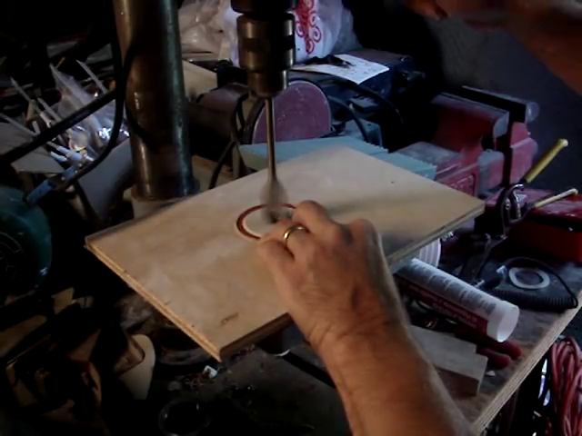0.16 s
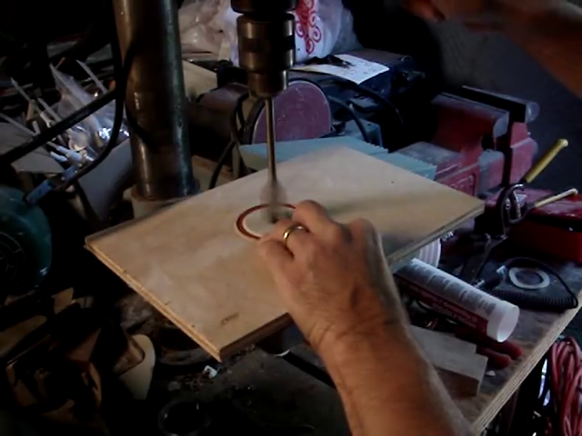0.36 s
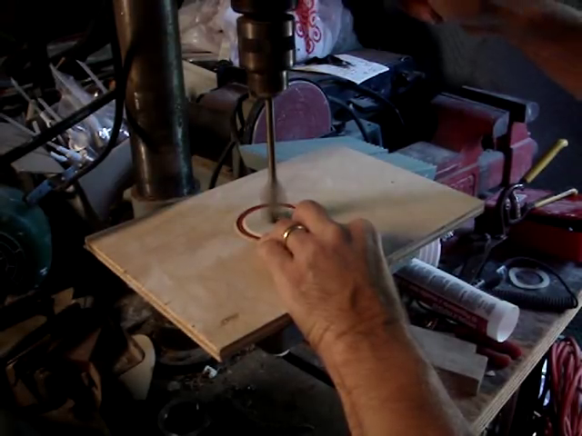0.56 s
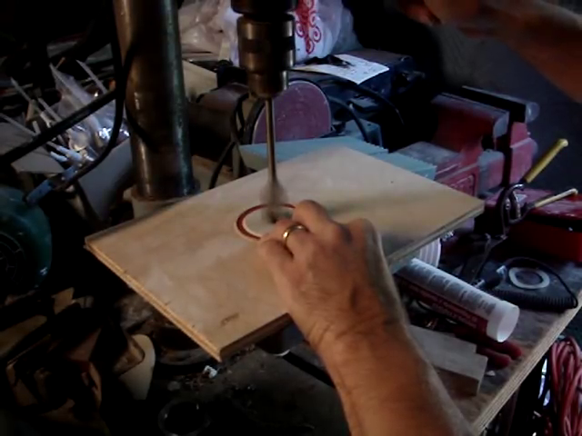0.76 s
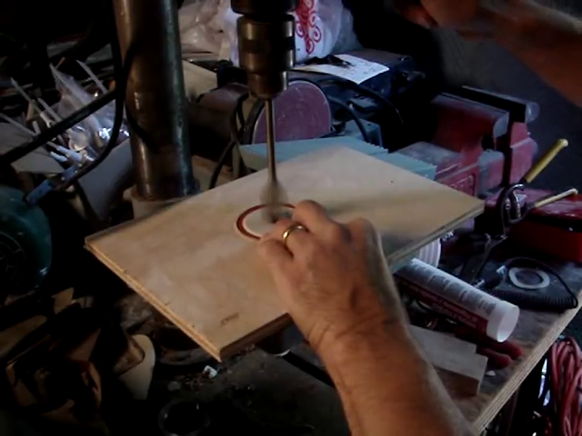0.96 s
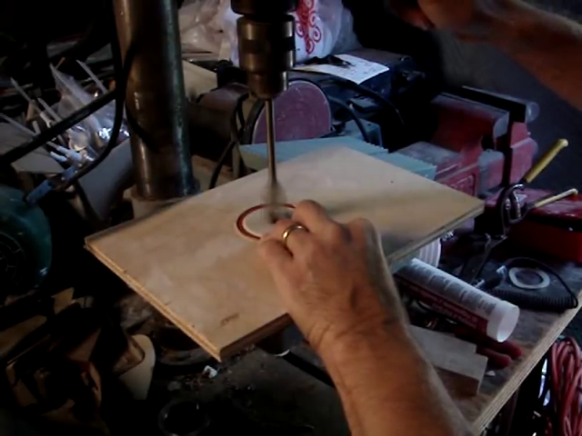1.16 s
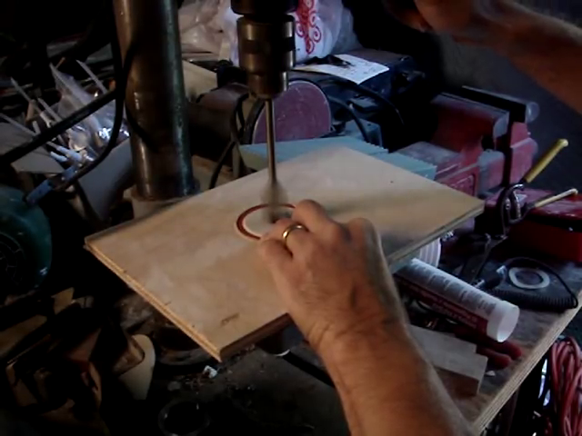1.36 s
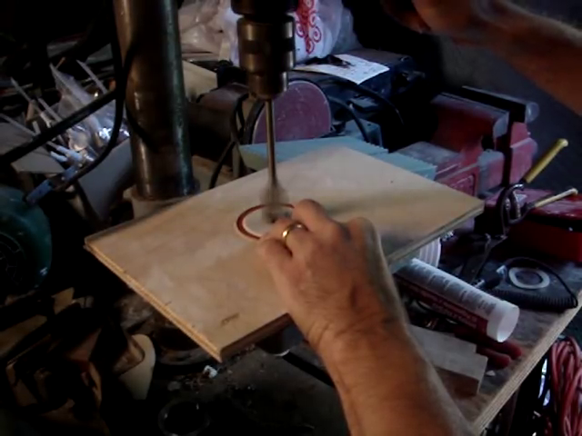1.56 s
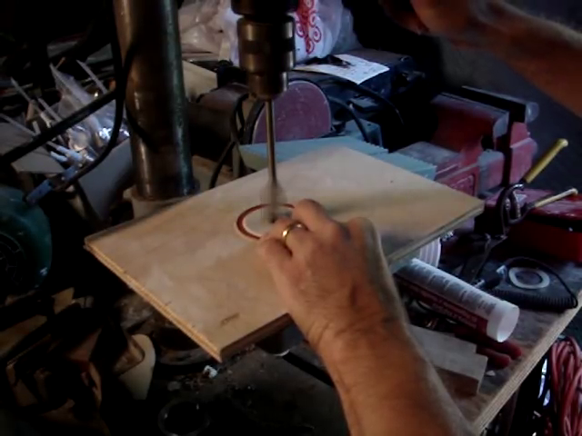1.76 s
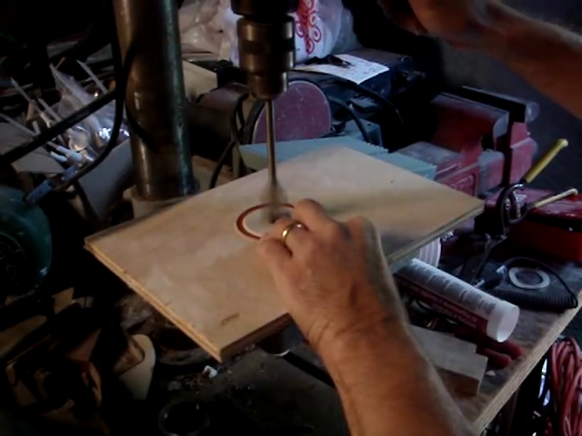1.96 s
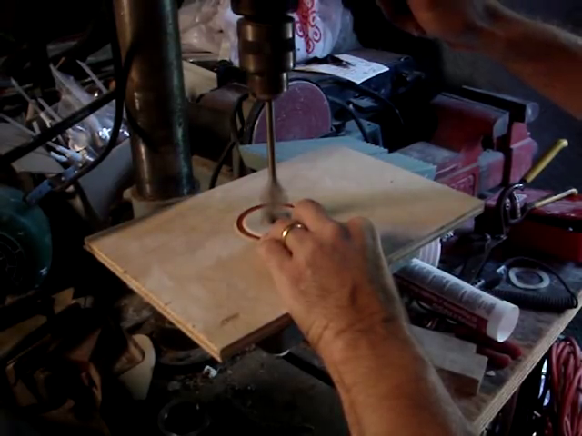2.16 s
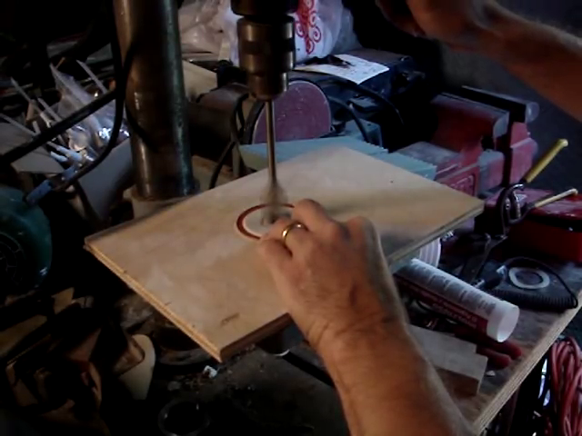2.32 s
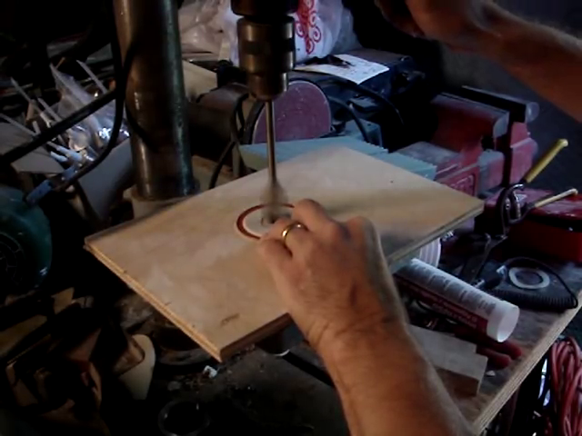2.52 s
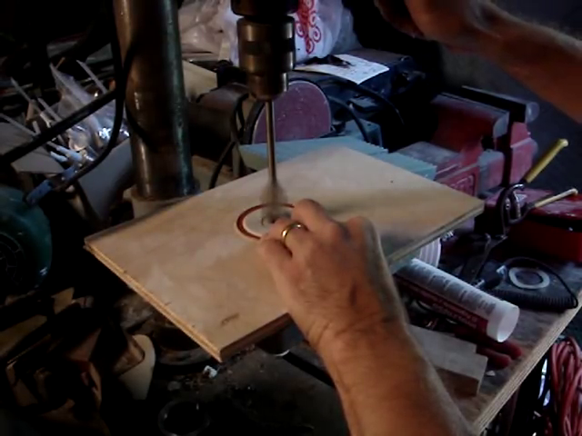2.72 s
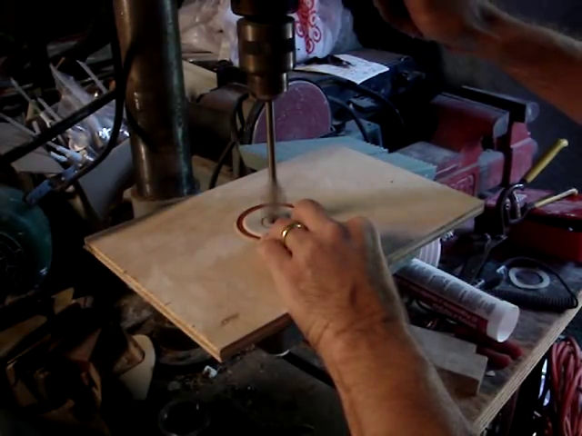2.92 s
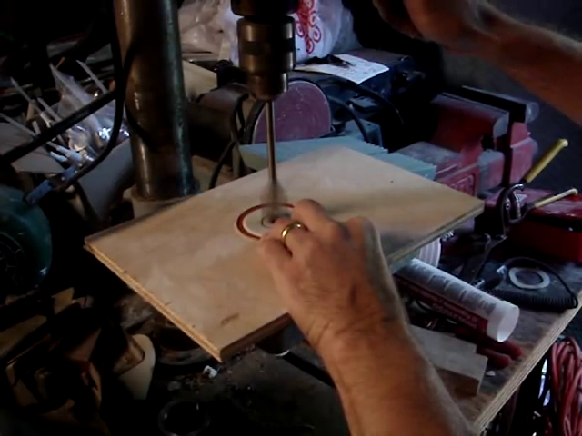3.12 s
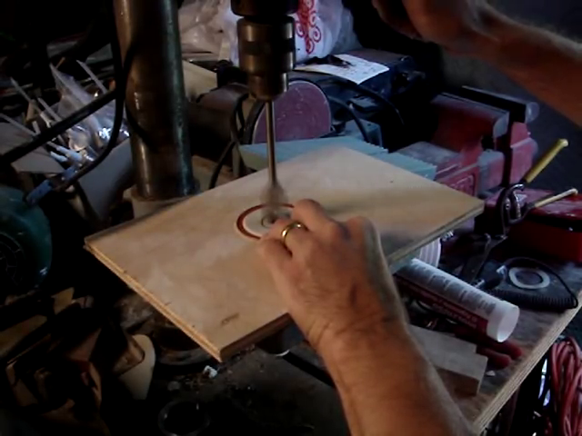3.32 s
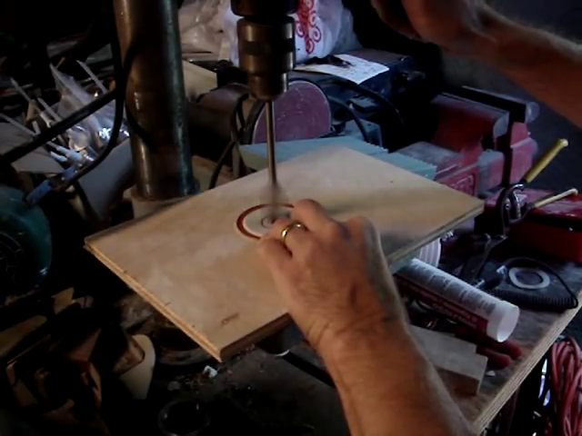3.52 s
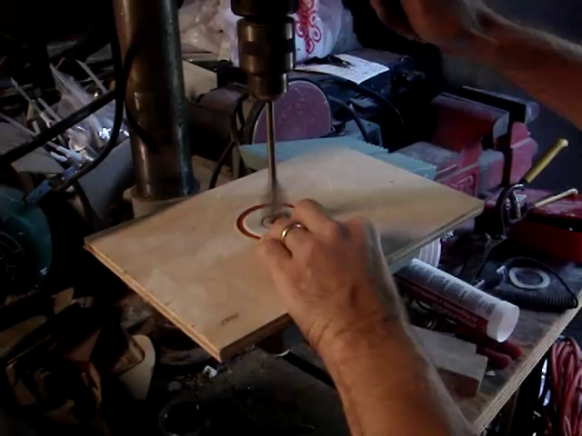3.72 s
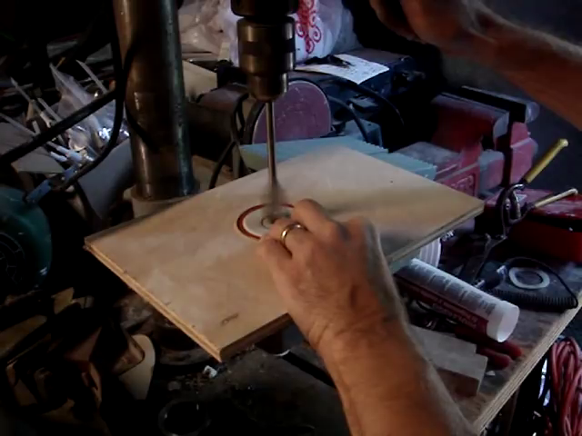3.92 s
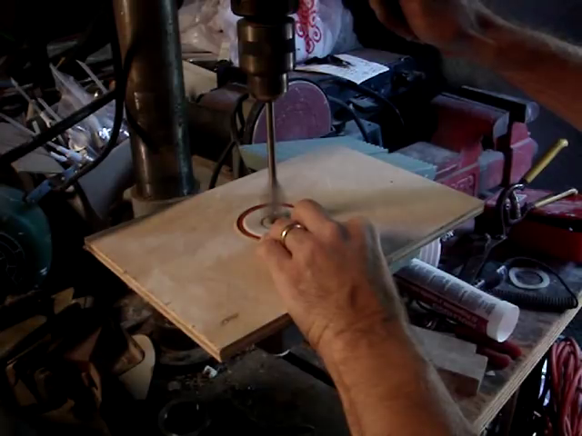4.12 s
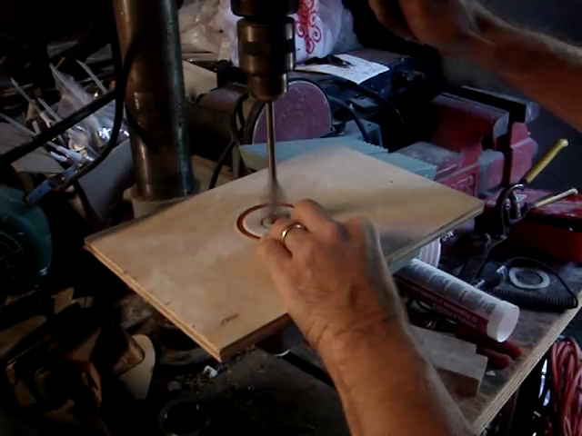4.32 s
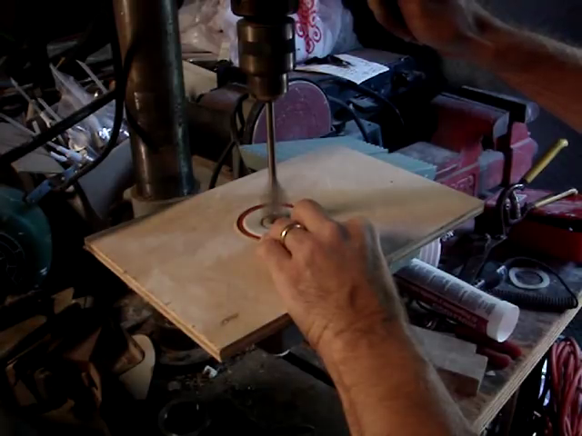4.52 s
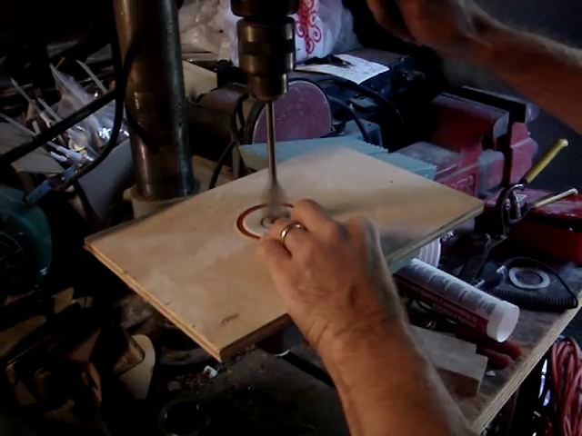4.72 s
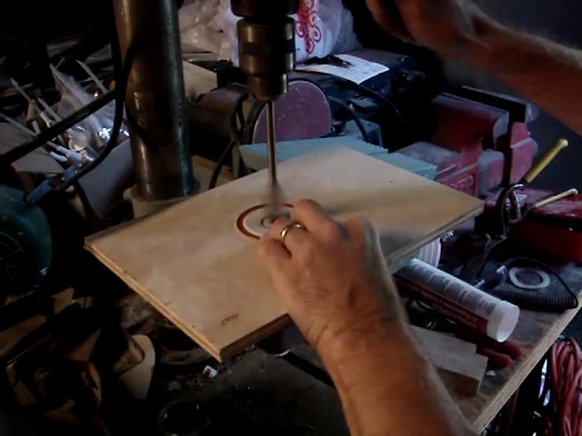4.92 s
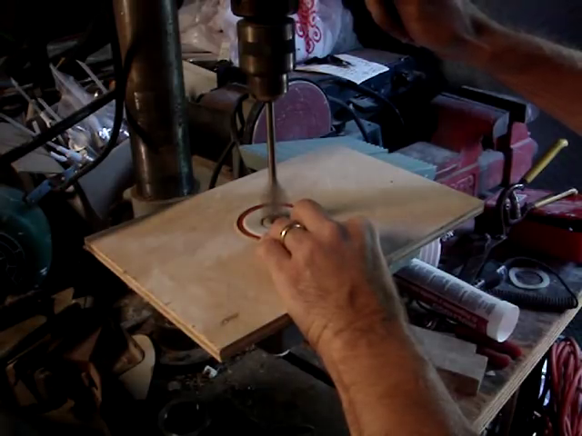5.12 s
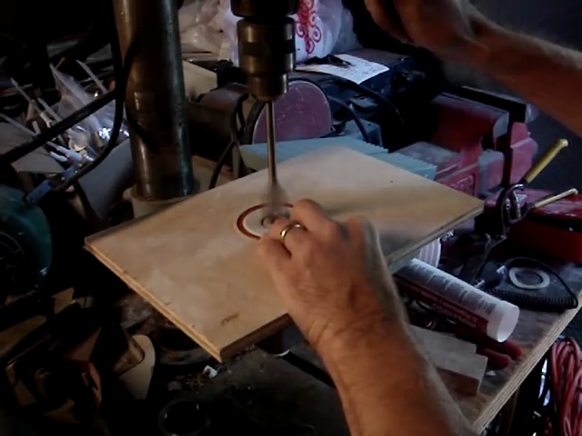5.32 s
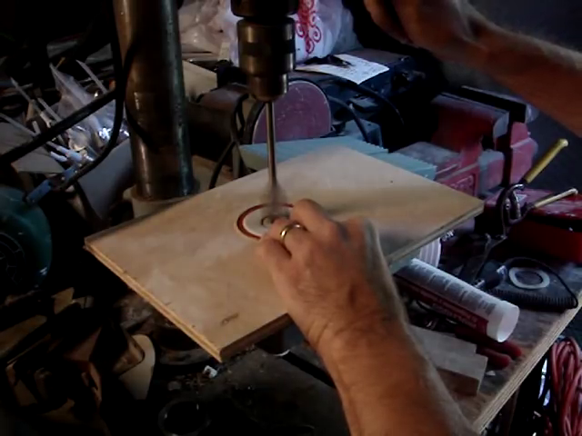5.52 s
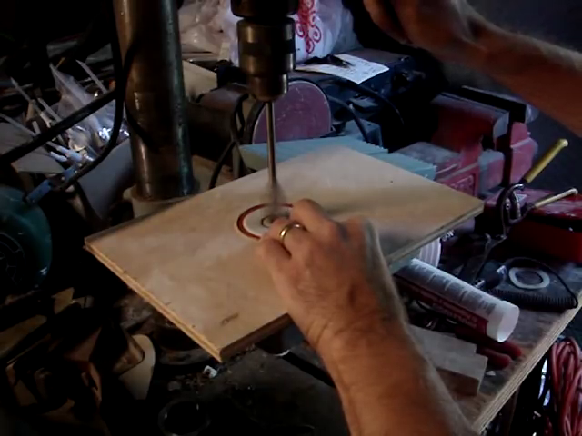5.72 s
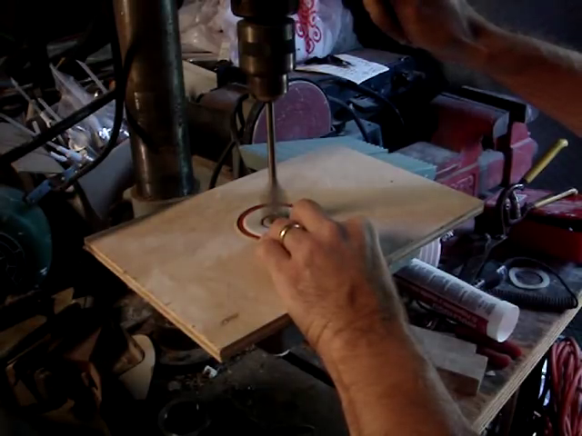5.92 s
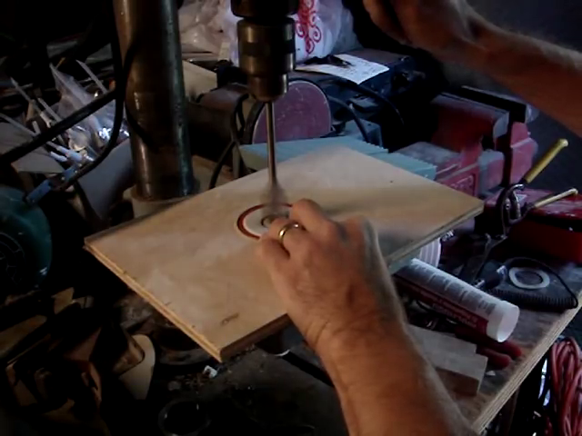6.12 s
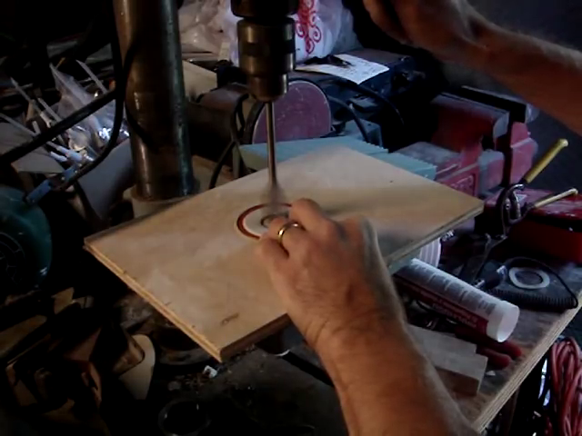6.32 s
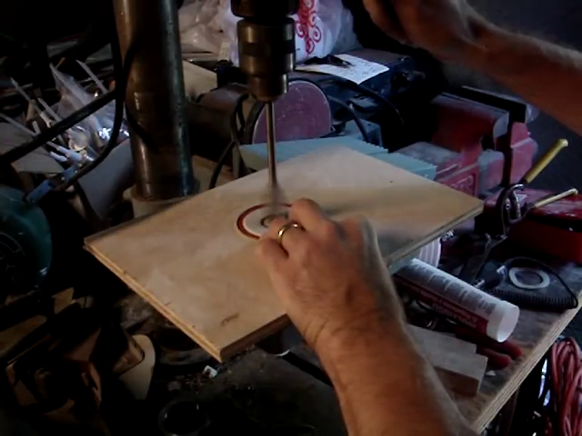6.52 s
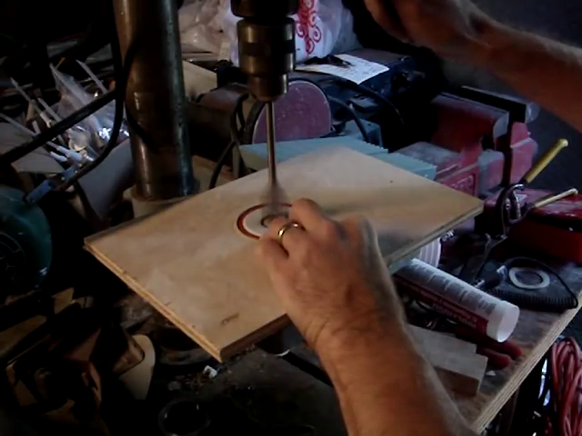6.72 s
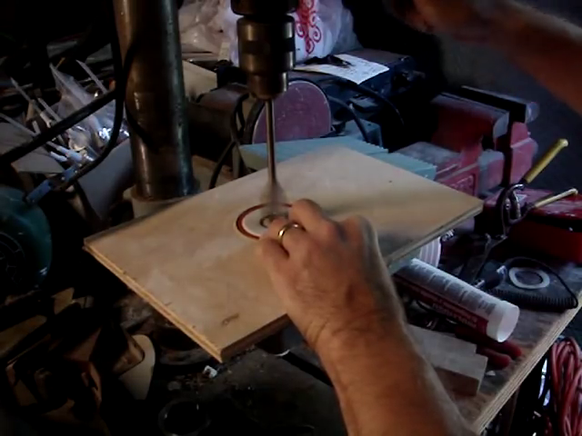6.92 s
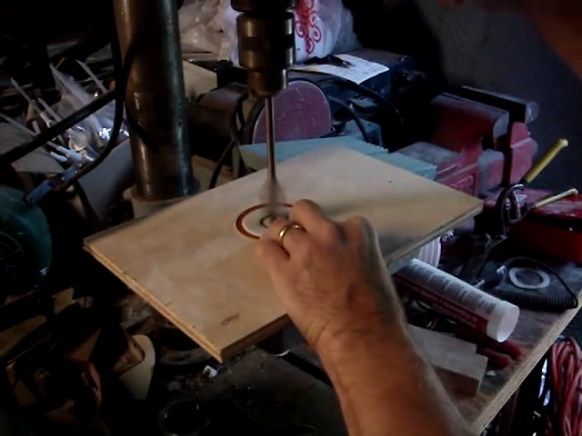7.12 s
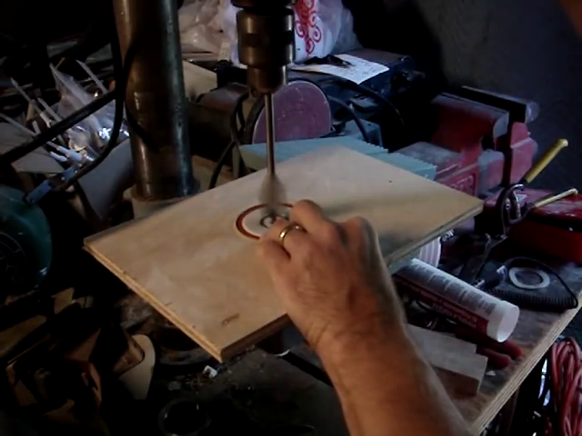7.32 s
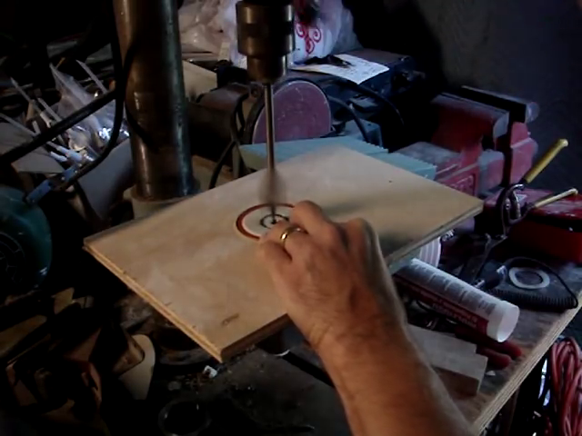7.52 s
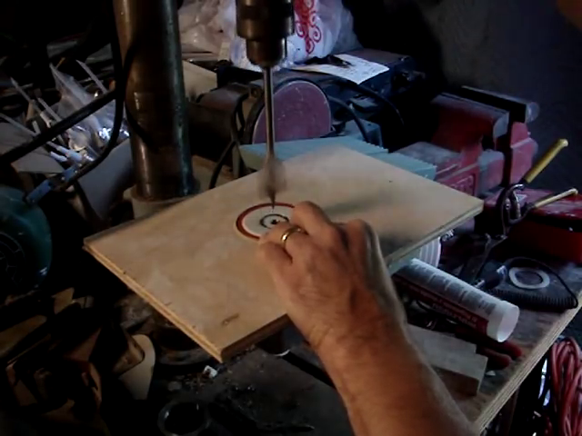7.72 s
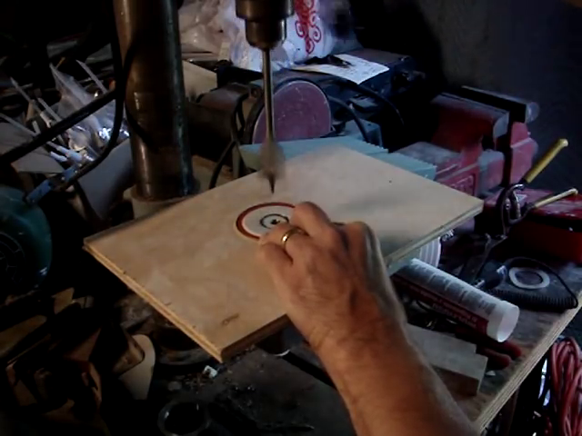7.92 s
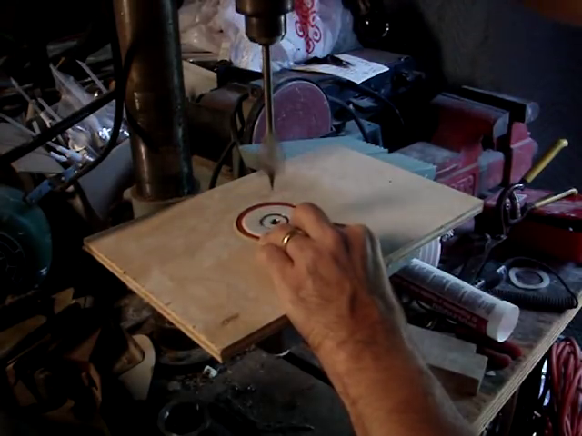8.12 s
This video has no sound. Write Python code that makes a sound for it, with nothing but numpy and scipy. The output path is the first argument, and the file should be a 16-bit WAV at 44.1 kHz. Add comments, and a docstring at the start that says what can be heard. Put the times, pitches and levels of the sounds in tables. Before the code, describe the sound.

Close workshop drilling of a metal lid: low shaking grind, piercing fluttering screech, bright throbbing scrape, then quiet motor rumble and lever clunks.

```python
"""Drill press cutting a thin metal lid

A drill press drives a flat bit through a thin metal lid on a board, close to a small camera in a workshop.
The bit grinds and shakes the press, chatters into a screech, scrapes in throbs as it breaks through, and is
lifted: the press rumbles on with a few knocks. The cut is coloured noise that partly repeats each turn; the
screech adds moving resonances and tones on multiples of the turn, and whistles are sines gated by the turn."""
import sys
import numpy as np
from scipy import signal
from scipy.fft import rfft, irfft
from scipy.io import wavfile
from scipy.ndimage import uniform_filter1d

SR = 44100
rng = np.random.default_rng(int(sys.argv[2]) if len(sys.argv) > 2 else 0)


def store_wav(level_fs):
    """Save 16-bit WAV to argv[1]."""
    pcm = np.round(np.clip(np.atleast_2d(level_fs), -1, 1) * 32767)
    wavfile.write(sys.argv[1], SR, pcm.T.astype(np.int16))


N = 359856
T = np.arange(N) / SR  # seconds
HZ = np.fft.rfftfreq(N, 1 / SR)
STEP = 64  # samples between points of slow controls

TURN = 1711  # samples in one turn of the spindle, 25.8 turns a second
DIP_S = 5.461  # a moment at which the tilted lid slips clear of the cutting edge
LIFT_S = 6.95  # the bit comes clear of the lid
WEAR_S = (3.6, 4.1)  # the pattern of marks changes over between these moments

# Levels of the cut, before flicker and the lift: time_s, press_shaking_db, dull_grinding_db,
# lower_chatter_db, upper_chatter_db, bright_scraping_db
CUT_LEVELS = [(0, -15.5, -19.5, -34, -26.5, -27), (.7, -19, -18, -31, -22, -27.5),
              (1.15, -20.5, -19.5, -26, -21, -29.5), (1.45, -17.5, -21, -25, -22.5, -26),
              (1.82, -17.5, -22, -21, -19.5, -26), (2.05, -21, -24.5, -18, -18, -25),
              (2.24, -22, -28, -16.5, -17, -22.5), (2.5, -26, -31.5, -19.5, -18, -22),
              (3.05, -33.5, -31.5, -21.5, -19, -23), (3.7, -48, -33, -20, -21.5, -24),
              (4.3, -53, -32.5, -17.5, -22.5, -22), (4.8, -40, -27.5, -21.5, -21, -22.5),
              (5.05, -38, -29, -21, -19, -22.5), (5.42, -51, -30, -29, -26.5, -19.5),
              (5.9, -41, -28.5, -24, -34, -20), (6.1, -36, -31, -29, -34, -19.5),
              (6.3, -38, -27, -27, -37, -21.5), (6.42, -33, -28, -25, -34, -18),
              (6.58, -33, -28.5, -21.5, -28, -18), (6.8, -37.5, -26, -29, -38, -19),
              (6.89, -41, -24.5, -26, -30, -20), (6.95, -32.5, -28, -36, -31, -27)]
# Regeneration of the cut, each column scaled anew for each sound: time_s, share_of_marks_met_again (0-1),
# scraping_throb_db, screech_throb_db
TURN_MARKS = [(0, 0.43, 2, 2), (1.5, 0.54, 1, 13), (2, 0.32, -1.5, 18), (2.6, 0.59, 3, -0.5),
              (4, 0.65, -2, -3.5), (4.82, 0.78, 1.5, 5.5), (4.95, 0.68, 0.5, 4), (5.5, 0.3, 8, 14),
              (5.8, 0.5, 0, 11), (6.35, 0.38, 0, 13), (6.9, 0.58, 0, 9), (7.1, 0.4, 4, 2)]
# The five sounds of the cut, in the order above, once the bit is lifted: decay_db_per_s,
# level_db of the bit spinning in the air
FREE_BIT = [(100, -33.5), (130, -41.5), (250, -48), (150, -55.5), (450, -56)]


def gain_of(db):
    """Level law: decibels to an amplitude factor."""
    return 10 ** (np.asarray(db) / 20)


def evened(x):
    """Power normalization: scales to rms 1."""
    return x / np.sqrt(np.mean(x ** 2) + 1e-20)


def curve(rows, order, before=None):
    """Linear interpolation of one table column to every sample."""
    rows = np.array(rows)
    return np.interp(T, rows[:, 0], rows[:, order], before)


def fine(coarse):
    """Linear interpolation from the coarse grid to every sample."""
    return np.interp(T, T[::STEP], coarse)


def slow(rate):
    """Random drift of rms 1 on the coarse grid: a sum of sines from 0.3 Hz to rate in Hz."""
    f = np.geomspace(.3, rate, 24)
    phase = rng.random(24)
    waves = np.sin(2 * np.pi * (T[::STEP, None] * f + phase))
    return evened(waves @ f ** -.5)


def flicker(db, rate):
    """Random amplitude modulation of rms depth db: noise smoothed by one pole at rate in Hz."""
    pole = np.exp(-2 * np.pi * rate * STEP / SR)
    noise = signal.lfilter([1], [1, -pole], rng.standard_normal(len(T[::STEP])))
    return fine(gain_of(db * evened(noise)))


def read(points, hz):
    """Spectral envelope as gains, interpolated in dB along a log frequency axis."""
    f, db = np.transpose(points)
    return gain_of(np.interp(np.log(hz + 1), np.log(f + 1), db))


def peak(hz, centre_hz, width):
    """Lorentzian resonance curve, 1 at its centre and one half at half a width away."""
    return 1 / (1 + (2 * (hz - centre_hz) / width) ** 2)


def with_modes(points, modes, hz):
    """Modal resonance: the powers of the modes add to a smooth spectrum."""
    modal_power = sum(gain_of(db) ** 2 * peak(hz, f, w) ** 2 for f, w, db in modes)
    return read(points, hz) * np.sqrt(1 + modal_power)


def press_gain(hz):
    """Structural resonance: the colour that column, table and board give to any shaking."""
    # Column, table and board between their modes: frequency_hz, relative_density_db_per_hz
    structure_spectrum = [(88, -59), (150, -41.5), (351, -6), (428, -5), (470, -13.5), (500, -7), (650, -9),
                          (794, -4.5), (1260, -7.5), (1360, -4.5), (1520, -35.5), (6000, -50.5),
                          (7800, -80), (13200, -120)]
    # Their modes: frequency_hz, width_hz, height_above_spectrum_db
    structure_modes = [(352, 12, 7), (427, 43.6, 13.5), (493, 64, 7), (608, 64, 7), (787.6, 31.5, 14),
                       (1390, 13, -1.5), (1720, 65, -1), (2150, 30, 10.5), (3350, 100, 5.5),
                       (5850, 270, 17)]
    return with_modes(structure_spectrum, structure_modes, hz)


def resonate(x, hz, width):
    """Heterodyne resonance: shifts the curve hz to zero, smooths twice, and shifts back."""
    turning = np.exp(2j * np.pi * np.cumsum(hz) / SR)
    r = np.exp(-np.pi * width / SR)
    smooth = signal.lfilter([1], [1, -2 * r, r * r], x * turning.conj())
    return evened((turning * smooth).real)


def surface(memory, gains):
    """Regenerative cutting: each turn's noise keeps a share of the turn before; then a colour."""
    turns = N // TURN + 1
    fresh = rng.standard_normal((turns, TURN))
    keep = np.clip(memory[::TURN], 0, .98)
    marks = [fresh[0]]
    for new, share in zip(fresh[1:], keep[1:]):
        marks.append(share * marks[-1] + np.sqrt(1 - share ** 2) * new)  # power is kept
    return evened(irfft(rfft(np.ravel(marks)[:N]) * gains, N))


def throb(depth_db, lag, power):
    """Periodic amplitude modulation: for positive depth, springs up and then sinks once a turn."""
    angle = ((T - DIP_S) * SR / TURN - lag) % 1  # turns since the slip
    gain = gain_of(uniform_filter1d(-depth_db * angle ** power, size=400))
    return gain / np.sqrt(uniform_filter1d(gain ** 2, TURN))  # keeps the power of each turn


def lines(table, crest, scatter, waver_db, waver_turns, rate):
    """Harmonic series of the spindle: wavering tones whose phases gather near the angle crest."""
    out = np.zeros(N)
    angle = (np.arange(TURN) - DIP_S * SR) / TURN - crest
    for hz, *db in table:
        multiple = np.round(hz * TURN / SR)
        carrier = np.resize(np.exp(2j * np.pi * multiple * angle), N)
        level_db = np.interp(T[::STEP], WEAR_S, (db[0], db[-1]))
        gain = gain_of(level_db + waver_db * slow(rate))
        phase = waver_turns * slow(rate) + scatter * rng.standard_normal()
        out += (carrier * fine(gain * np.exp(2j * np.pi * phase))).real
    return out / np.sqrt(uniform_filter1d(out ** 2, size=8 * TURN))


def comb(hz, below, above, early_db, late_db, fall_db):
    """Sidebands one turn rate apart round a centre: frequency_hz, early_db, late_db."""
    rows = []
    for k in range(-below, above + 1):
        early, late = (-(k != 0) * (db + fall_db * (abs(k) - 1)) for db in (early_db, late_db))
        rows.append((hz + k * SR / TURN, early, late))
    return rows


def settled(start_s):
    """Exponential settling: power share of steady lines, until the marks break up."""
    largest_share, settle_time_s = .88, .5
    break_s, break_time_s = 4.84, .09
    growth = 1 - np.exp(-np.maximum(T - start_s, 0) / settle_time_s)
    return largest_share * growth * np.clip(1 - (T - break_s) / break_time_s, 0, 1)


def cut_gain(rows, order, db_per_s, free_db):
    """Power addition: the cut's level, dying away after the lift, over what the free bit makes."""
    cutting_db = curve(rows, order, before=-94.0) - db_per_s * np.maximum(T - LIFT_S, 0)
    return np.hypot(gain_of(cutting_db), gain_of(free_db))


def floor():
    """Background noise: steady hiss, and faint noise mostly below 70 Hz that swells and drops at 6.95 s."""
    # Steady hiss: frequency_hz, relative_density_db_per_hz
    hiss_spectrum = [(20, -29), (150, -33), (400, -10.5), (2000, -12.5), (5000, 4), (9800, 5), (10500, -8)]
    # Swells added to the gain of the deep bass: centre_s, half_length_s, level_db
    bass_swells = [(2.77, 0.073, -50), (3.22, .12, -51), (3.77, .15, -54), (4.897, .1, -48),
                   (5.4, 0.37, -53), (6.048, .15, -55)]
    hiss = gain_of(-47.5) * surface(0 * T, read(hiss_spectrum, HZ))
    deep_bass = surface(0 * T, peak(HZ, 0, 68)) * flicker(2.7, 12)
    level = gain_of(-62 - 6.5 * (T > LIFT_S))
    for s, half, db in bass_swells:
        level = level + gain_of(db) * np.exp(-2 * ((T - s) / half) ** 2)
    return hiss + level * deep_bass


def hum():
    """Motor vibration: one wavering low tone over a soft resonant rumble."""
    # Low sounds of the motor; the rumble comes forward once the bit is free:
    # time_s, tone_peak_db before flicker, rumble_db
    motor_levels = [(0, -47, -48), (1.5, -55, -46), (5.3, -56, -51.5), (5.8, -68, -49.5), (7, -61, -47.5),
                    (7.6, -64, -44.5), (8.16, -61, -38.5)]
    tone_hz = 208
    tone = flicker(3.5, 6) * np.sin(2 * np.pi * (tone_hz * T + fine(.5 * slow(6))))
    rumble = surface(0 * T, peak(HZ, 130, 90) + gain_of(17) * peak(HZ, 320, 130) ** 2)
    return gain_of(curve(motor_levels, order=1)) * tone + gain_of(curve(motor_levels, order=2)) * rumble


def knocks():
    """Impulse response: each knock is a decaying burst that rings the press, with a metallic ring on top."""
    # Feed lever and quill as the bit is raised: start_s, level_db before a common 5 dB cut,
    # ring_hz, ring_width_hz, ring_db against the body
    lever_knocks = [(7.074, -22.5, 3300, 500, -6), (7.156, -21.5, 2900, 1400, -2),
                    (7.18, -23.5, 2500, 900, -10), (7.209, -30, 2140, 150, -2), (7.28, -28, 1850, 300, -27),
                    (7.415, -30, 1880, 300, -20), (7.639, -21, 1430, 200, -6), (7.723, -23, 2140, 300, -19),
                    (7.85, -24.5, 1790, 300, -13), (7.973, -18, 1830, 300, -15),
                    (8.049, -18.5, 1410, 200, -8), (8.088, -18.5, 5040, 2200, -8),
                    (8.144, -14, 2130, 400, -11)]
    length = 6000  # samples
    t = np.arange(length) / SR
    hz = np.fft.rfftfreq(length, 1 / SR)
    out = np.zeros(N + length)
    bursts = rng.standard_normal((len(lever_knocks), 2, length))
    for (s, db, ring_hz, width, ring_db), (a, b) in zip(lever_knocks, bursts):
        body = evened(irfft(rfft(a) * press_gain(hz))) * gain_of(-60 * t / 0.38)
        ring_colour = np.sqrt(peak(hz, ring_hz, width) ** 2 + 0.0022)
        ring_decay_s = 0.14 + 18 / width  # to -60 dB: a narrow ring lasts longer
        ring = evened(irfft(rfft(b) * ring_colour)) * gain_of(ring_db - 60 * t / ring_decay_s)
        attack = np.minimum(t / .007, 1)
        out[round(s * SR):][:length] += gain_of(db - 5) * (body + ring) * attack
    return out[:N]


def press():
    """Forced vibration: motor, belt and cutting force shake column, table and board."""
    # Multiples of the two edges passing: frequency_hz, relative_level_db
    edge_beats = [(258.4, -55), (360.7, -52), (414.5, -35.5), (511.4, -31.5), (565.2, -36.5),
                  (619.1, -37.5), (775.2, -38)]
    share = curve(TURN_MARKS, order=1)
    rumble = surface(0.83 * share, press_gain(HZ)) * flicker(1.6, 15.7)
    beats = gain_of(-7.5) * lines(edge_beats, .3, 0.44, 2.8, 0.26, 6)
    beats = beats * np.clip(3.0 * share - .3, 0, 1)  # stronger where the marks repeat
    return cut_gain(CUT_LEVELS, 1, *FREE_BIT[0]) * (rumble + beats)


def grinding():
    """Tearing noise filtered by plate modes: the edges tear at the sheet, dull and grainy."""
    # Dull cutting noise: frequency_hz, relative_density_db_per_hz
    tearing_spectrum = [(500, -30), (850, 0), (1020, -9), (1360, -5), (1710, 3.5), (1910, 1), (2440, -1.5),
                        (3800, -9.5), (4570, -20), (5730, -13), (6960, -31.5), (8900, -19), (9860, -47.5),
                        (12800, -67), (21700, -120)]
    # The lid held on the board: frequency_hz, width_hz, height_above_spectrum_db
    lid_modes = [(1000, 17, -4), (1200, 66, 6.5), (1511, 66, 6), (1716, 83, 3), (2637, 59, 7),
                 (3260, 76, 2.5), (4170, 200, 9.5)]
    noise = surface(0.83 * curve(TURN_MARKS, order=1), with_modes(tearing_spectrum, lid_modes, HZ))
    noise = noise * flicker(2.64, 120) * throb(0.48 * curve(TURN_MARKS, order=2), .03, 1.5)
    return cut_gain(CUT_LEVELS, 2, *FREE_BIT[1]) * noise


def scraping():
    """Friction noise: the spurs rub a bright hiss off the lid; its treble throbs and flickers the most."""
    # Bright rubbing noise: frequency_hz, relative_density_db_per_hz
    rubbing_spectrum = [(760, -48.5), (1300, -29.5), (1480, -11), (1610, -23.5), (2180, -2), (2480, -7),
                        (3300, -4.5), (3820, -6.5), (4560, -2.5), (5830, -8), (9860, -23.5), (12800, -61),
                        (21700, -120)]
    memory = .5 * curve(TURN_MARKS, order=1)
    depth_db = curve(TURN_MARKS, order=2)
    colour = read(rubbing_spectrum, HZ)
    low_share = peak(HZ, 0, 9900) ** 2  # of the power; the treble has the rest
    low = surface(memory, colour * np.sqrt(low_share))
    high = surface(memory, colour * np.sqrt(1 - low_share))
    low = low * throb(depth_db, .02, 1.5) * flicker(2, 120)
    high = high * throb(6.2 * depth_db, 0.011, 5.0) * flicker(2.4, 40)
    return cut_gain(CUT_LEVELS, 5, *FREE_BIT[4]) * (low + gain_of(-3.5) * high)


def whistle():
    """Gated sine tones: nearly pure, with a trembling pitch, cut into beads by the turn."""
    # start_s, rise_s, hold_s, fall_s, pitch_hz at the start, glide_hz_per_s, level_db before flicker,
    # bead_lag_turns after the slip, lag_drift_turns_per_s
    whistle_notes = [(4.85, 0.37, 0.9, .12, 4470, -90, -24.5, 0.056, .42),
                     (5.2, 0.51, 0.44, .25, 2160, -40, -26, -.09, .01),
                     (6.2, .25, 0.29, .2, 2140, -11.5, -27, -.06, .01)]
    out = np.zeros(N)
    for s, rise, hold, fall, hz, glide, db, lag, drift in whistle_notes:
        pitch_hz = (hz + glide * (T - s)) * flicker(.09, 60)  # about 1 % of tremble
        tone = np.sqrt(2) * np.sin(2 * np.pi * np.cumsum(pitch_hz) / SR)
        shape = np.interp(T - s, np.cumsum([0, rise, hold, fall]), [0, 1, 1, 0]) ** 2
        shape = shape * flicker(1.5, 15)
        beads = throb(24 + 0 * T, lag + drift * (T - s), 1.1)
        out += gain_of(db) * shape * beads * tone
    return out


def screech():
    """Regenerative chatter: the bit resonates in its own marks; noise hardens into lines, with overtones."""
    # Two chatter modes of the bit, each with its side modes: frequency_hz, width_hz, relative_level_db
    bit_modes = [
        [(2171, 100, -6), (2121, 204, -4.5)],
        [(2371, 168, -1.5), (2614, 260, -4), (3408, 22, -16.5)],
    ]
    # Chatter pitch of the resonant noise: time_s, factor
    pitch_curve = [(0, 1), (1.6, 1.01), (2, 1.02), (2.25, 1), (4.84, 1), (4.92, 1.01), (5.3, 1.01),
                   (5.7, .975), (6.1, .97), (6.5, .99), (6.9, .96)]
    # Lines round the two modes and the second overtone: centre_hz, lines_below, lines_above,
    # early_drop_db and late_drop_db of the nearest lines, further_fall_db_per_line
    squeal_lines = [(2191, 1, 2, 13, 7, 7), (2423, 4, 2, 8, 9, 1), (4472, 6, 10, .5, 1, .9)]
    # Second to fourth overtone: frequency_hz, width_hz
    overtone_bands = [(4480, 330), (6620, 420), (8880, 450)]
    # Their levels: time_s, second_db, third_db, fourth_db
    overtone_levels = [(1.6, -37, -51, -45), (2.1, -29, -60, -51), (2.4, -24.5, -48, -42.5),
                       (2.85, -22, -37, -38.5), (3.3, -22.5, -35, -35), (4.3, -22, -34.5, -37.5),
                       (4.85, -23, -36, -38), (5.5, -23.5, -32, -39), (6.05, -24.5, -29.5, -36.5),
                       (6.3, -36, -38, -45), (6.8, -26, -28.5, -41), (6.95, -43, -45, -48)]
    settle_s = (2.1, 2.6)  # the lower mode hardens first

    drive = surface(1.05 * curve(TURN_MARKS, order=1), 1)
    depth_db = curve(TURN_MARKS, order=3)
    pitch = curve(pitch_curve, order=1)
    out = np.zeros(N)
    for k, (modes, depth) in enumerate(zip(bit_modes, (1.1, .6))):
        rough = evened(sum(gain_of(db) * resonate(drive, hz * pitch, w) for hz, w, db in modes))
        clean = lines(comb(*squeal_lines[k]), .16, (.05, .15)[k], .8, .04, 3)
        share = settled(settle_s[k])
        tone = np.sqrt(1 - share) * rough + np.sqrt(share) * clean
        tone = tone * throb(depth * depth_db, 0.035, 0.46)
        out = out + tone * cut_gain(CUT_LEVELS, 3 + k, *FREE_BIT[2 + k])
    for k, (hz, width) in enumerate(overtone_bands):
        tone = resonate(drive, hz * np.sqrt(pitch), width)  # the overtones sag less than the fundamental
        if k == 0:
            share = 0.62 * settled(settle_s[0])
            clean = lines(comb(*squeal_lines[2]), .77, .09, .73, .04, 3.3)
            tone = np.sqrt(1 - share) * tone + np.sqrt(share) * clean
        level = cut_gain(overtone_levels, order=k + 1, db_per_s=FREE_BIT[4][0], free_db=-90.)
        out = out + level * tone * throb(6.3 * depth_db, 0.019, 9.4)
    return out


def scene():
    """Superposition: all sources add at one microphone."""
    background = floor() + hum() + knocks()
    cut = press() + grinding() + scraping() + whistle() + screech()
    return (background + cut)[None]


def record(dry):
    """Saturation and band-limiting: soft overload on the peaks, then a steep low-pass."""
    ceiling, edge_hz = 1.325, 10050
    held = ceiling * np.tanh(dry / ceiling)
    low_pass = signal.firwin(801, edge_hz, window=("kaiser", 10), fs=SR)
    return signal.oaconvolve(held, low_pass[None], "same")


dry = scene()
out = record(dry)
store_wav(out)
```